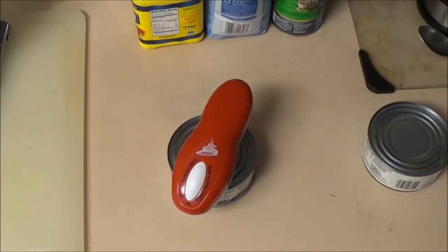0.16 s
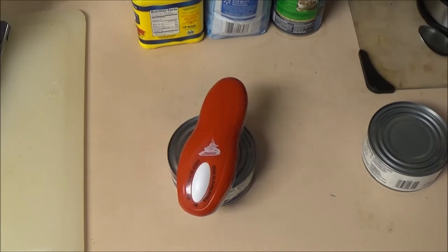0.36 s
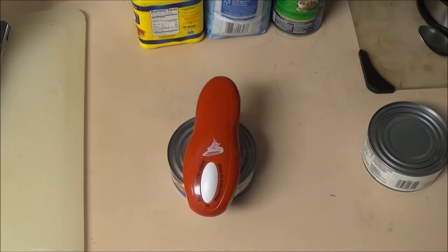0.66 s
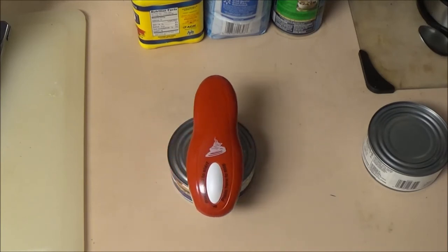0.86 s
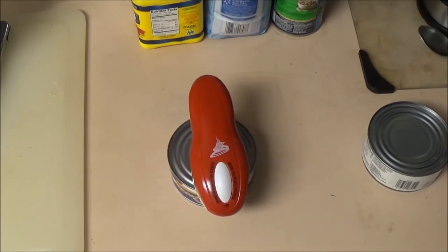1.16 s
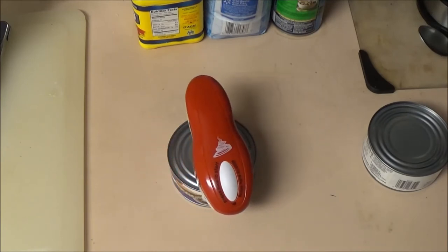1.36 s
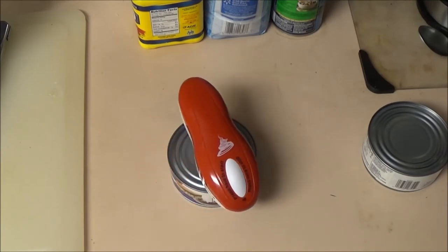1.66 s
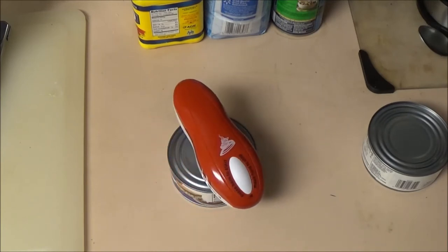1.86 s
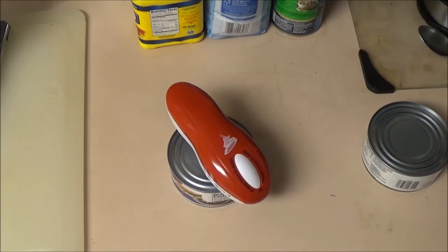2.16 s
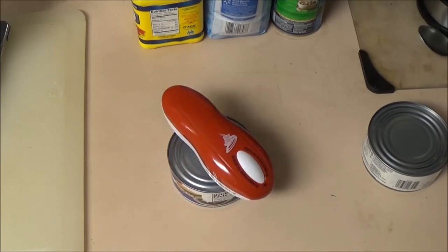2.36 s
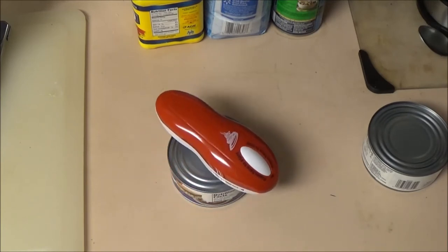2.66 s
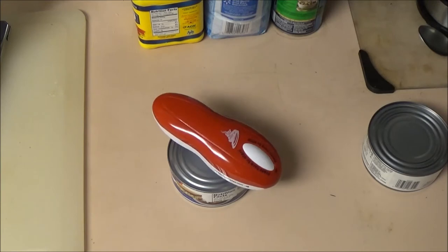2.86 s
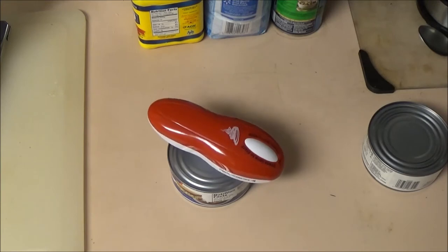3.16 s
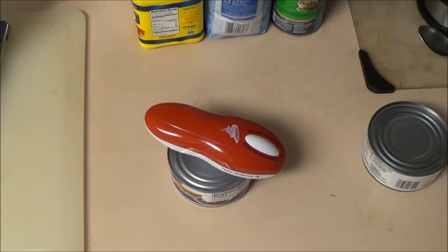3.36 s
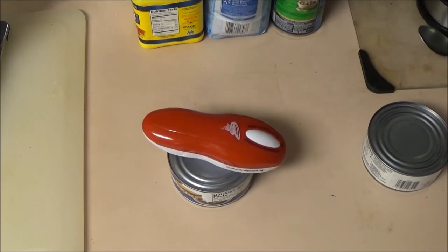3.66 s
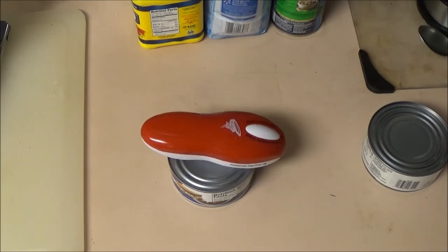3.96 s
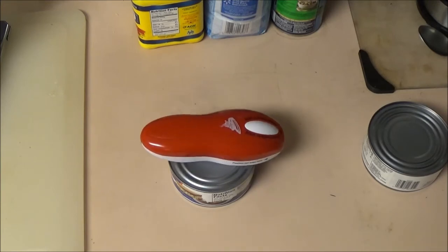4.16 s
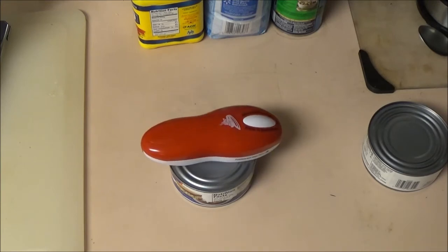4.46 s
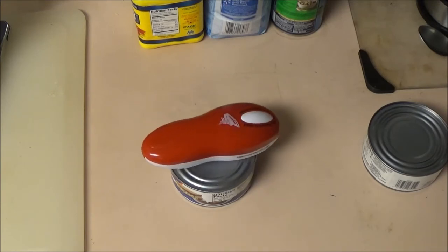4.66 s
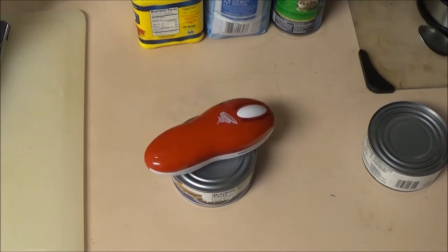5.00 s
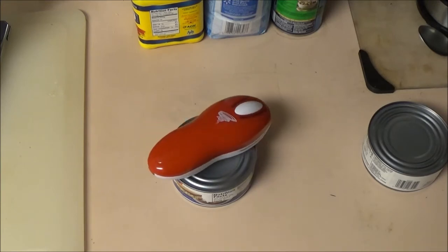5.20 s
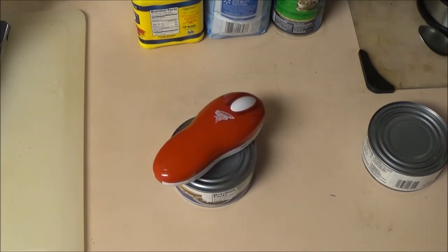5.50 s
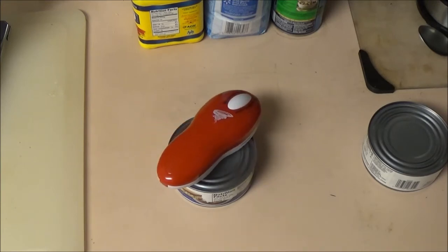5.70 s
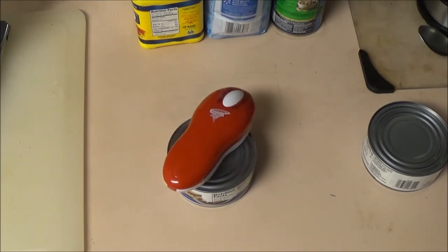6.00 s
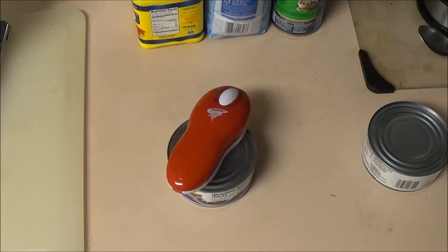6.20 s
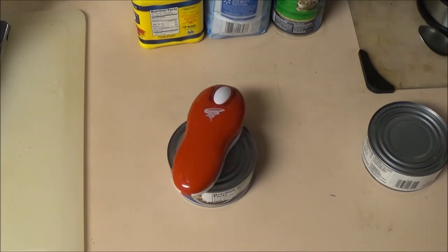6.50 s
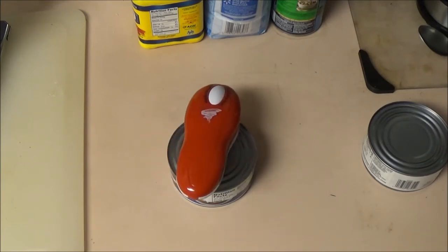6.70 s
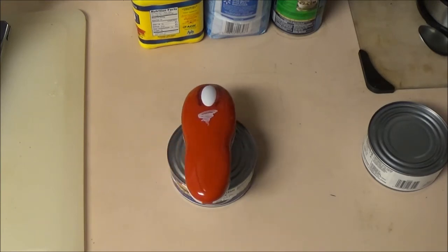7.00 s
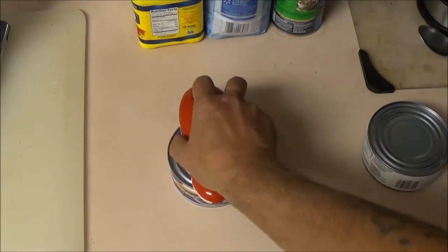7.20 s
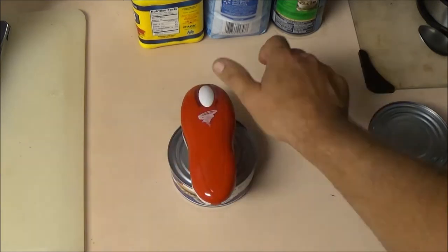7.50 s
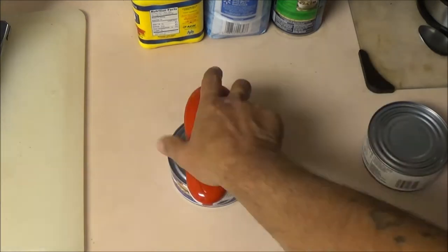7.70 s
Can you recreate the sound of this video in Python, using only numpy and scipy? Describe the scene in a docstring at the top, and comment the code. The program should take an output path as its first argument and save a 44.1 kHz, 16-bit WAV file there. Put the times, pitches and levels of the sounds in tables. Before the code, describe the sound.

A cordless electric can opener whines and rattles around a tin, wavering in pitch, then sputters, revs once and dies away.

```python
"""On a kitchen counter, a cordless electric can opener crawls round a tin, its small motor slowing and racing
with the load. A ten-tooth pinion whines, the loose gear train buzzes and rattles in the plastic shell, the
cutter rubs, a thin tone wavers faintly, and the tin knocks now and then. The cutter comes free, a hand stops
the motor, it whirs up once more and dies away. An appliance hums faintly behind."""
import sys
import numpy as np
from scipy import signal
from scipy.fft import rfft, irfft
from scipy.io import wavfile
from scipy.ndimage import uniform_filter1d, minimum_filter1d

SR = 44100
rng = np.random.default_rng(int(sys.argv[2]) if len(sys.argv) > 2 else 0)


def waveform_to_disk(signal):
    """Save audio, clipped to [-1, 1], as 16-bit WAV at the path in sys.argv[1]."""
    frames = np.transpose(np.atleast_2d(signal))
    scaled = np.clip(frames, -1, 1) * 32767
    samples = np.round(scaled).astype(np.int16)
    wavfile.write(sys.argv[1], SR, samples)


N = 346185
T = np.arange(N) / SR
TEETH = 10  # on the pinion
# Gear looseness. Each row: time in seconds, play from 0 to 1, tick against fizz in dB.
PLAY = [(0, 0, -3), (3, 0, -5), (4.3, 0, -9), (5, 0, -2), (5.6, 0, 4), (6.93, 0, 3), (7, .1, 3),
        (7.3, .1, 2), (7.35, .7, -9), (7.43, .3, -12), (7.55, .4, -12), (7.7, .8, -12)]


def shaft(unrest=.002):
    """Running count of motor turns; each off-centre reduction gear sways the speed once per gear turn."""
    # Motor labours, races, stalls, restarts. Each row: time in seconds, speed before sway in Hz.
    speed = [(0.0, 444.0), (0.09, 450.6), (0.46, 437.5), (0.53, 424.8), (0.98, 415.9), (1.21, 443.9),
             (2.09, 436.0), (2.21, 417.7), (3.04, 464.2), (3.51, 420.9), (3.97, 396.4), (4.71, 453.9),
             (5.18, 437.5), (5.55, 401.1), (5.76, 397.7), (6.46, 447.0), (6.55, 415.6), (6.945, 424),
             (6.97, 472), (7.01, 485), (7.11, 474), (7.15, 452), (7.24, 432), (7.27, 398), (7.335, 375),
             (7.355, 620), (7.4, 300), (7.425, 252), (7.49, 305), (7.59, 612), (7.7, 595), (7.76, 300)]
    # Gears. Each row: shaft turns per gear turn, sway as share of speed, shaft turns to lightest load.
    reduction = [(10, .005, 9.6), (70 / 3, .0115, 5.2), (100, .01, 17), (350 / 3, .005, 113)]
    hz, = curves(speed)
    turns = np.cumsum(hz) / SR
    sway = sum(share * np.cos(2 * np.pi * (turns - lightest) / ratio)
               for ratio, share, lightest in reduction)
    return np.cumsum(hz * (1 + sway + unrest * walk(45))) / SR


def gear_train(turns, cruise_hz=450, stall_hz=374, off_s=7.70, release_s=.06, coast_db=-21):
    """Whine and rattle: buzz grows with speed, teeth soften in a stall, both fade when power is cut."""
    # Tooth tone and its octave. Each row: time in seconds, level before gearbox lift in dB.
    tooth_levels = [(0.0, -36), (2.16, -37), (2.3, -42), (2.39, -37.5), (2.74, -51), (3.11, -39),
                    (3.88, -36.5), (4.32, -33.5), (4.71, -44.5), (5.43, -36.5), (7.24, -42.5),
                    (7.29, -36.4)]
    octave_levels = [(0.0, -24), (0.53, -27.5), (0.58, -20), (1.09, -28.5), (1.58, -21.5), (1.7, -26.5),
                     (2.3, -19), (2.55, -28.0), (2.67, -22.5), (4.02, -18), (5.39, -28.5), (5.5, -20.5),
                     (6.46, -32), (7.29, -29.4)]
    # Treble. Each row: time in seconds, relative rasp level in dB, relative fizz level in dB.
    treble_levels = [(0.0, -26.5, -31), (1.12, -26, -32), (1.22, -27.5, -32.5), (2.42, -25, -27.5),
                     (2.84, -31.5, -24), (3.62, -20, -27.5), (4.04, -22.5, -29.5), (4.57, -21, -29),
                     (4.63, -21, -27.5), (5.92, -22, -31), (6.89, -22, -30), (7.01, -20, -28),
                     (7.24, -31, -28), (7.3, -16.5, -31)]
    # Gears lose and regain contact as the hand grabs.
    # Each row: centre in seconds, change in dB, half length in seconds.
    sputters = [(7.323, -12, .004), (7.331, 7, .004), (7.339, -3, .003), (7.346, 4, .0025)]
    hz = np.gradient(turns) * SR
    tooth_db, = curves(tooth_levels)
    octave_db, = curves(octave_levels)
    rasp_db, fizz_db = curves(treble_levels)
    play, _ = curves(PLAY)
    stall_db = 6.5 * np.log2(np.minimum(hz / stall_hz, 1))
    tooth_db += gearbox_db(TEETH * hz)
    octave_db += gearbox_db(2 * TEETH * hz) + stall_db
    buzz_db = -26 + 18 * np.log2(np.minimum(hz / cruise_hz, 1)) + stall_db
    clack_db = -21.5 - .1 * T + stall_db  # drifts as the opener turns on the tin
    rasp_db += 1 - 19 * play + stall_db  # loose teeth hardly slide
    fizz_db += 1 + stall_db
    sound = whine(turns, tooth_db, octave_db, buzz_db, rasp_db)
    sound += rattle(turns, clack_db, rasp_db, fizz_db)
    sound += undb(stall_db) * loose_wheels(turns)
    power_db = coast_db * np.clip((T - off_s) / release_s, 0, 1)
    sputter_db = sum(db * np.exp(-((T - s) / half_s) ** 2) for s, db, half_s in sputters)
    return sound * undb(power_db + sputter_db)


def whine(turns, tooth_db, octave_db, buzz_db, rasp_db):
    """Tooth tone and octave, flanked by shaft multiples because no two teeth are alike."""
    # Uneven pinion: buzz, and rasp round the third tooth harmonic.
    # Each row: multiple of the shaft rate, relative level in dB.
    buzz_lines = [(3, -38), (5, -33), (6, -31), (8, -30), (9, -12), (11, -9), (12, -19), (13, -12),
                  (14, -15), (15, -16), (16, -12), (17, -5), (18, -6), (19, -5), (21, -1), (22, -8),
                  (23, -10), (24, -13), (25, -10), (26, -13)]
    rasp_lines = [(27, -10), (28, -10), (29, -7), (30, -9), (31, -7), (34, -15)]
    # A lower tone swells and fades. Each row: time in seconds, level in dB.
    sing_levels = [(0, -43), (.5, -46.5), (.8, -51.5), (1.4, -51.5), (3, -52), (3.8, -53.5), (4.6, -45),
                   (5.2, -51.5), (5.6, -43.5), (6.4, -43), (6.8, -52), (7.3, -49), (7.4, -70)]
    play, _ = curves(PLAY)
    sing_db, = curves(sing_levels)
    loose_turns = turns + .025 * play * walk(700)
    tooth = undb(tooth_db) * partial(loose_turns, order=TEETH, flutter=.22, flutter_hz=150)
    octave = undb(octave_db) * partial(loose_turns, order=2 * TEETH, flutter=.24, flutter_hz=170)
    buzz = undb(buzz_db) * shaft_lines(turns, buzz_lines, flutter=.34, dispersion=.01164, surge_db=2)
    sing = undb(sing_db) * partial(turns, order=7, flutter=.8, flutter_hz=200)
    # The rasp glides with the motor but sounds only in one band of the shell.
    shell_band = signal.butter(3, [11500, 13700], "band", fs=SR, output="sos")
    rasp = shaft_lines(turns, rasp_lines, flutter=.7, dispersion=0, surge_db=.5)
    rasp = undb(rasp_db - 2) * unit(signal.sosfilt(shell_band, rasp))
    # The second gear, with four times the teeth, presses unevenly.
    throb = 1 + .3 * np.cos(2 * np.pi * turns / 4) + .3 * np.cos(np.pi * turns)
    throb += .3 * np.cos(2 * np.pi * turns)  # off-centre pinion
    return (1 - .62 * play) * (tooth + throb * octave + buzz + rasp) + sing


def shaft_lines(turns, lines, flutter, dispersion, surge_db):
    """Shaft multiples; each surges on its own and swells as it glides through a shell resonance."""
    hz = np.gradient(turns) * SR
    grid_hz = np.arange(0, SR // 2, 20)
    lift = undb(shell_db(grid_hz))
    sound = 0
    for order, db in lines:
        # The shell spreads each turn's jolt: high and low multiples arrive apart.
        line = partial(turns, round(order), flutter, flutter_hz=69.88, lag_cycles=dispersion * order ** 2)
        swell = unit(np.interp(order * hz, grid_hz, lift) * undb(surge_db * walk(7)))
        sound += undb(db) * swell * line
    return sound


def rattle(turns, clack_db, rasp_db, fizz_db, tick_s=.0008):
    """Teeth clack and slide, hardest once a turn; a nick in the next gear ticks every tenth turn."""
    # Spectra of shell rattle, sliding teeth, fizz with tick. Each row: frequency in Hz, relative dB.
    clack_colour = [(300, -54), (750, -41), (1000, -48), (1600, -18.5), (2500, -24.5), (3400, -18),
                    (4300, -4.5), (5300, -5.5), (6600, -10), (7600, -8.5), (8400, 6.5), (9600, 3.5),
                    (11000, 2.5), (11800, -27.5)]
    slide_colour = [(9000, -43.5), (11200, 2), (11700, 5), (12800, 1.5), (13600, -2), (14800, -31)]
    fizz_colour = [(10000, -45), (13300, 8), (14300, -7), (15400, 14.5), (16000, -23)]
    play, tick_db = curves(PLAY)
    press = np.cos(2 * np.pi * turns) + .5 * np.cos(2 * np.pi * turns / 4)
    clack = unit(impacts(TEETH * turns, scatter_db=5.5, late_s=.0001) * (1 + .18 * press))
    slide = unit(impacts(TEETH * turns, scatter_db=1, late_s=.0001) * (1 + .15 * press))
    since_tick_s = (turns % 10) / np.gradient(turns) / SR
    tick = unit(np.exp(-since_tick_s / tick_s) * rng.standard_normal(N))
    fizz = (rng.standard_normal(N) + undb(tick_db) * tick) / np.hypot(1, undb(tick_db))
    grid_hz = np.arange(20, SR // 2, 20)
    resonant_colour = np.c_[grid_hz, spectrum_db(grid_hz, clack_colour) + .5 * shell_db(grid_hz)]
    return (undb(clack_db - 3 - 4 * play) * colour(clack, resonant_colour)
            + undb(rasp_db - 4.5) * colour(slide, slide_colour)
            + undb(fizz_db) * colour(fizz, fizz_colour))


def loose_wheels(turns, full_play_db=-19):
    """With play between the gears, each tooth strike rings the shell at its fixed pitches."""
    # Shell modes. Each row: frequency in Hz, width in Hz, relative level in dB.
    modes = [(6460, 220, -6), (7660, 490, 4.5), (8400, 320, -2), (10700, 300, 1)]
    play, _ = curves(PLAY)
    strikes = impacts(TEETH * turns, scatter_db=6, late_s=.0004)
    ring = sum(undb(db) * signal.lfilter(*signal.iirpeak(hz, hz / width_hz, fs=SR), strikes)
               for hz, width_hz, db in modes)
    return undb(full_play_db) * play * unit(ring)


def gearbox_db(hz):
    """Gearbox lift: a tone flares when the speed carries it onto a resonance."""
    # Each row: centre in Hz, width in Hz, lift in dB.
    resonances = [(4102, 62, 7.5), (4630, 584, 12.5), (8410, 68, 5), (9020, 600, 7)]
    return peaks_db(hz, resonances)


def shell_db(hz):
    """Lift or dip from the resonances of the plastic shell."""
    # Each row: centre in Hz, width in Hz, lift in dB.
    resonances = [(3100, 720, 5.5), (4617, 88, 7), (5635, 270, 5.5), (7630, 1050, 12.5), (8300, 43, -1),
                  (8930, 89, -9), (10800, 130, 6), (11600, 290, 4), (12650, 2400, 2)]
    return peaks_db(hz, resonances)


def knocks(click_s=.009, size=8192):
    """Each blow clicks and rings the damped tin, which is too small to give bass."""
    # Blows on tin and shell. Each row: start in seconds, relative level in dB, click offset in dB.
    blows = [(1.037, -48, -20), (1.167, -33.5, -16), (6.950, -31.5, -3), (6.956, -44.5, 18.5),
             (6.962, -58, -1), (7.171, -41, -4), (7.329, -55, 14), (7.346, -52, 9), (7.556, -41, -5),
             (7.632, -41, -25), (7.792, -42, 5), (7.798, -39.5, 5), (7.809, -46.5, 11), (7.821, -42, 7)]
    # Modes of the full tin. Each row: frequency in Hz, relative level in dB, T60 in seconds.
    tin_modes = [(520, -7, .05), (775, -10, 0.15), (1007, 7.5, 0.074), (1500, 9, 0.06), (1490, 15.5, 0.012),
                 (1746, 5.5, 0.13), (2300, 7, 0.042), (3150, -27, .02)]
    # Contact click spectrum. Each row: frequency in Hz, relative dB.
    click_colour = [(400, -33), (1500, 6), (4000, 9), (7500, -2), (12000, -1), (16000, -16)]
    t = T[:size]
    tin = sum(undb(db - 60 * t / t60_s) * np.sin(2 * np.pi * hz * t) for hz, db, t60_s in tin_modes)
    ring, click = np.zeros((2, N + size))
    for start_s, db, click_db in blows:
        i = min(int(start_s * SR), N)
        ring[i:i + size] += undb(db - 12.5) * tin
        click[i:i + size] += undb(db + click_db) * rng.standard_normal(size) * np.exp(-t / click_s)
    bass_cut = signal.butter(3, 650, "high", fs=SR, output="sos")
    return signal.sosfilt(bass_cut, ring[:N] + colour(click[:N], click_colour))


def rubbing(grain_db=3):
    """Uneven scraping of the cutter on the rim, later of fingers on the shell."""
    # Each row: time in seconds, level in dB.
    rub_levels = [(0, -67), (.155, -62), (.168, -36), (.23, -44), (.3, -45.5), (.36, -64), (7.15, -51),
                  (7.32, -51), (7.45, -41.5), (7.65, -46.5), (7.75, -45), (7.85, -50)]
    # Friction spectrum. Each row: frequency in Hz, relative dB.
    rub_colour = [(300, -24.5), (800, -7), (1400, 3.5), (3000, 13), (5000, -1), (10000, -27)]
    db, = curves(rub_levels)
    return undb(db + grain_db * walk(200)) * colour(rng.standard_normal(N), rub_colour)


def squeak():
    """Thin, unsteady tone gliding faintly."""
    # Each row: time in seconds, pitch in Hz, level in dB.
    contour = [(4.3, 760, -85), (4.55, 850, -62.5), (4.8, 1040, -60), (4.9, 900, -70), (5.05, 890, -65),
               (5.4, 890, -60), (5.7, 810, -73), (5.85, 820, -64), (6.4, 935, -63), (6.6, 980, -62),
               (6.8, 980, -95)]
    hz, db = curves(contour)
    return undb(db) * partial(np.cumsum(hz) / SR, order=1, flutter=.81, flutter_hz=48.6)


def room(x, t60_s, size=16384):
    """Dense reflections off counter and cupboards."""
    t = T[:size]
    response = rng.standard_normal(size) * undb(-60 * t / t60_s) * (t > .002)
    return signal.oaconvolve(x, response / np.linalg.norm(response))[:N]


def kitchen(air_db=-54):
    """Quiet room air and a humming appliance."""
    # Appliance tones. Each row: frequency in Hz, level in dB.
    hum_tones = [(237, -80), (479.5, -69.5)]
    # Room air spectrum. Each row: frequency in Hz, relative dB.
    air_colour = [(25, -9), (100, -6), (220, 1), (350, 2.5), (580, 9.5), (750, 4), (1000, 17), (3000, 11),
                  (15000, -18)]
    hum = sum(undb(db) * partial(hz * T, order=1, flutter=.079, flutter_hz=4.13) for hz, db in hum_tones)
    return hum + undb(air_db) * colour(rng.standard_normal(N), air_colour)


def partial(turns, order, flutter, flutter_hz, lag_cycles=0):
    """One multiple of a cycle rate, shaking in size and phase; rms near 1."""
    angle = 2 * np.pi * ((order * turns - lag_cycles) % 1)
    in_phase = (1 + flutter * walk(flutter_hz)) * np.cos(angle)
    quadrature = flutter * walk(flutter_hz) * np.sin(angle)
    return np.sqrt(2 / (1 + 2 * flutter ** 2)) * (in_phase + quadrature)


def impacts(cycles, scatter_db, late_s):
    """One click per cycle, random in strength and sign, a little late."""
    onsets = np.flatnonzero(np.diff(np.floor(cycles)) > 0)
    strength, timing = rng.standard_normal((len(onsets), 2)).T
    onsets = np.clip(onsets + np.abs(timing * late_s * SR).astype(int), 0, N - 1)
    return unit(np.bincount(onsets, undb(scatter_db * strength) * np.sign(timing), N))


def colour(x, points, size=2048):
    """Minimum-phase filter through (Hz, dB) points; keeps the power of white noise."""
    hz = np.maximum(np.arange(size // 2 + 1) * SR / size, 1)
    cepstrum = irfft(np.log(undb(spectrum_db(hz, points))))
    cepstrum[1:size // 2] *= 2
    cepstrum[size // 2 + 1:] = 0
    response = irfft(np.exp(rfft(cepstrum)))
    return signal.oaconvolve(x, response / np.linalg.norm(response))[:N]


def spectrum_db(hz, points):
    """Interpolate (Hz, dB) points over log frequency."""
    point_hz, db = np.transpose(points)
    return np.interp(np.log(hz), np.log(point_hz), db)


def peaks_db(hz, peaks):
    """Sum of bell-shaped resonance curves."""
    return sum(db / (1 + (2 * (hz - centre_hz) / width_hz) ** 2) for centre_hz, width_hz, db in peaks)


def walk(rate_hz):
    """Random line with spread near 1 and rate_hz new values a second."""
    values = rng.standard_normal(16384)
    return 1.22 * np.interp(T * rate_hz, np.arange(len(values)), values)


def curves(table):
    """Each column after the first as a curve over time."""
    times_s, *columns = np.transpose(table)
    return [np.interp(T, times_s, column) for column in columns]


def undb(db):
    """Decibels to gain."""
    return 10 ** (np.asarray(db) / 20)


def unit(x):
    """Scale to rms 1."""
    return x / np.sqrt(np.mean(x ** 2))


def scene(wet_db=-14, side_db=-16):
    """Opener in the middle; only treble reflections differ between left and right."""
    # Side reflections. Each row: frequency in Hz, relative dB.
    side_colour = [(700, -18), (1500, -17), (2400, -13.5), (5500, 14.5), (8000, 5.5), (15000, 6.0)]
    opener = gear_train(shaft())
    direct = opener + knocks() + rubbing() + squeak()
    mid = direct + undb(wet_db) * room(direct, t60_s=.32) + kitchen()
    side = undb(side_db) * colour(room(opener, t60_s=.43), side_colour)
    return np.array([mid + side, mid - side])


def record(dry, ceiling=.8, top_hz=15700):
    """Quick peak limiter, then a steep low-pass."""
    gain = np.minimum(1, ceiling / (np.abs(dry).max(axis=0) + 1e-9))
    gain = uniform_filter1d(minimum_filter1d(gain, size=129), size=129)
    return signal.sosfilt(signal.ellip(12, .2, 85, top_hz, fs=SR, output="sos"), dry * gain)


dry = scene()
out = record(dry)
waveform_to_disk(out)
```